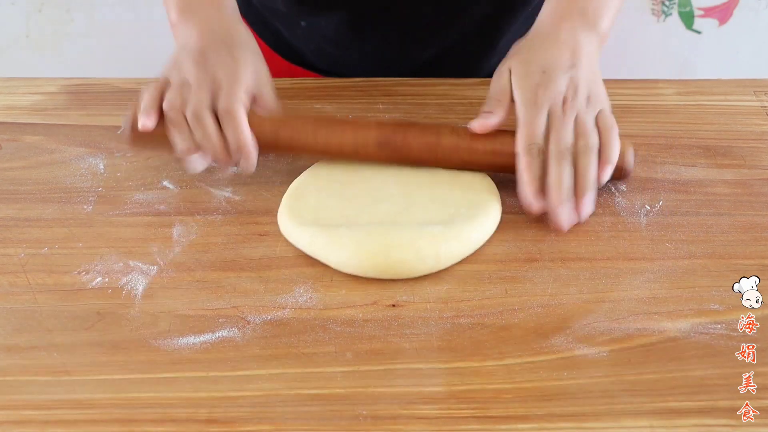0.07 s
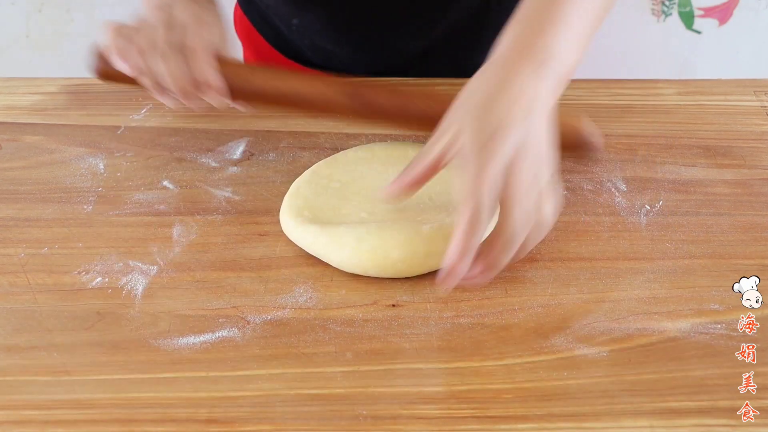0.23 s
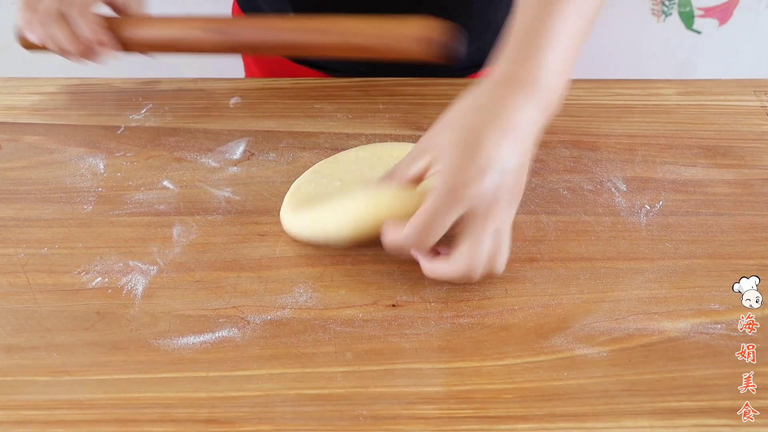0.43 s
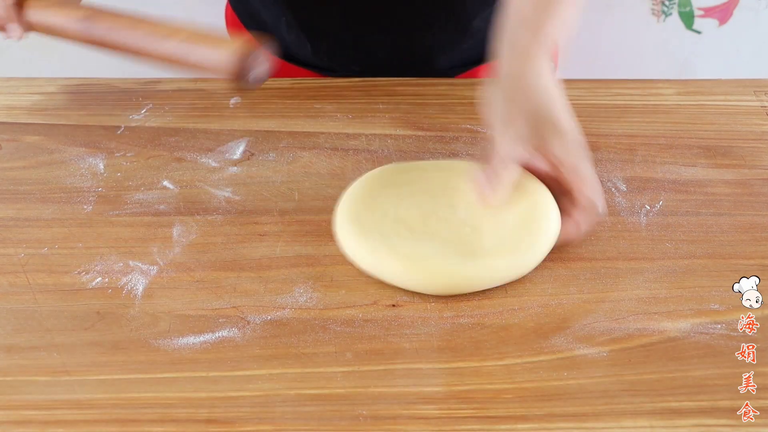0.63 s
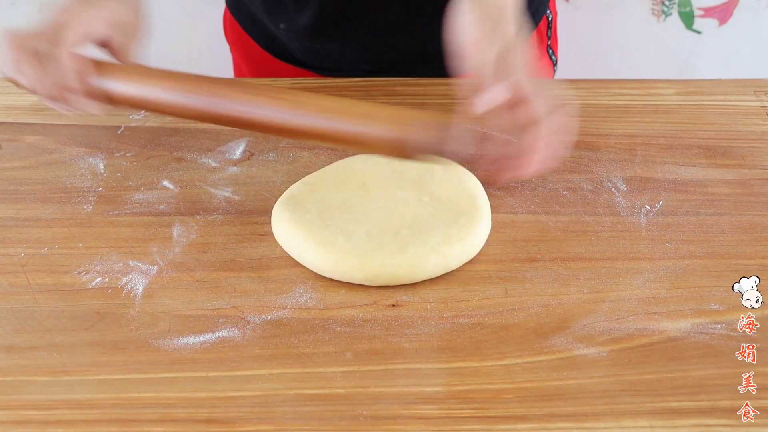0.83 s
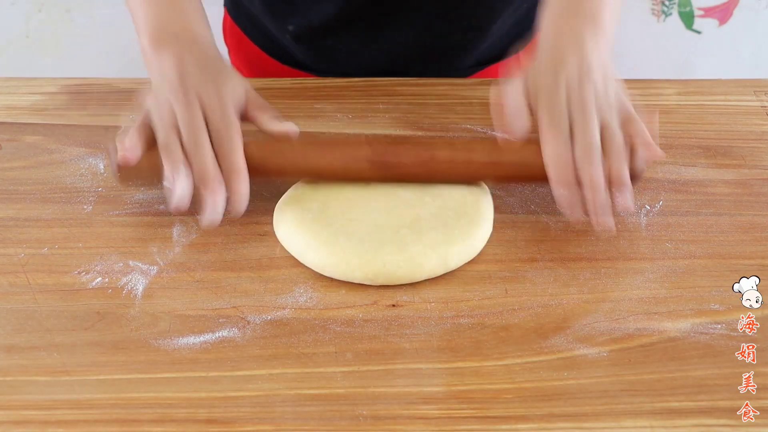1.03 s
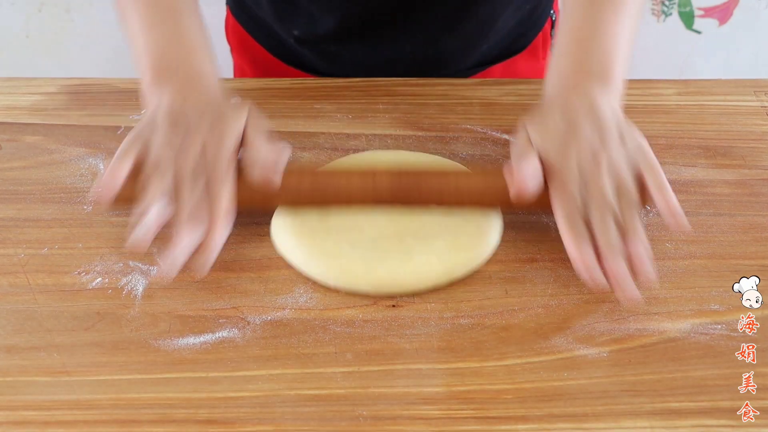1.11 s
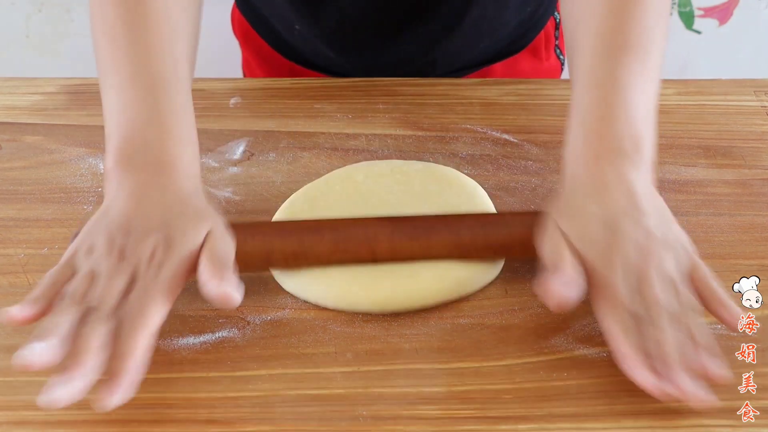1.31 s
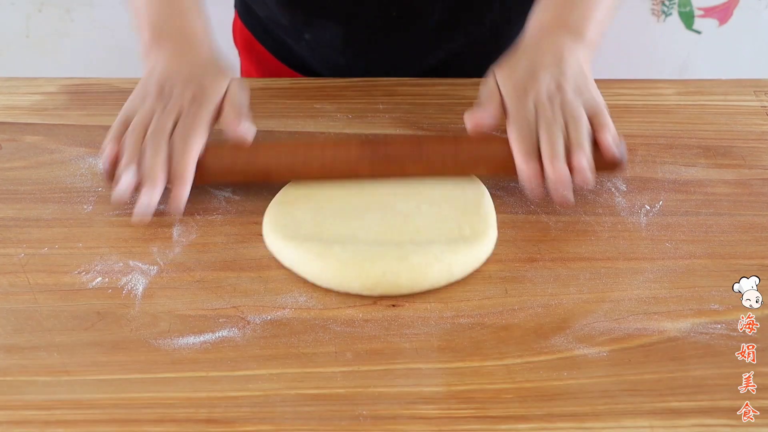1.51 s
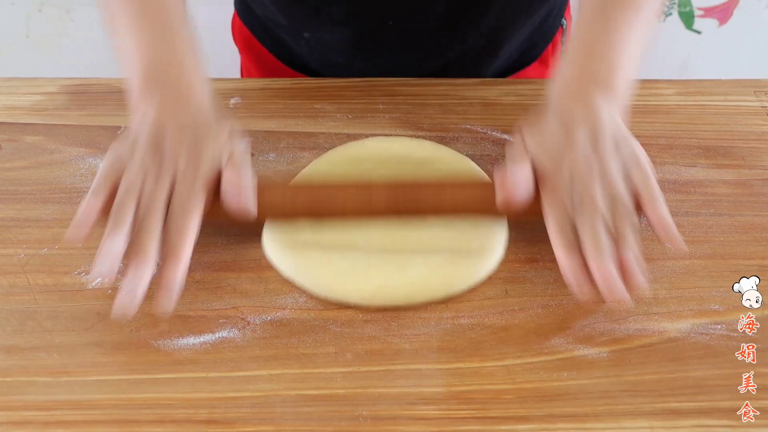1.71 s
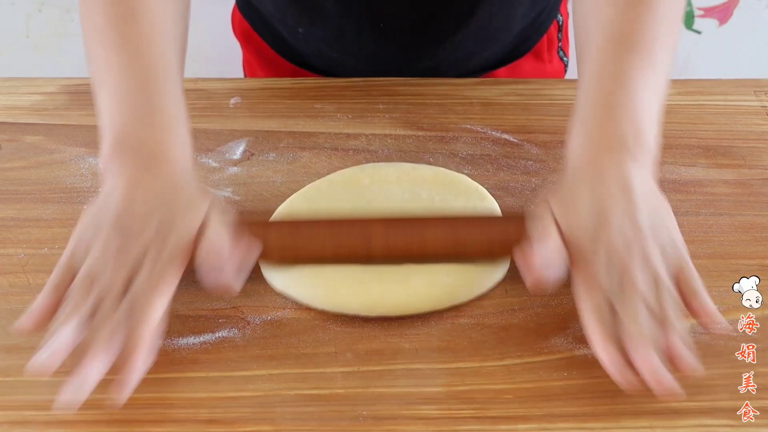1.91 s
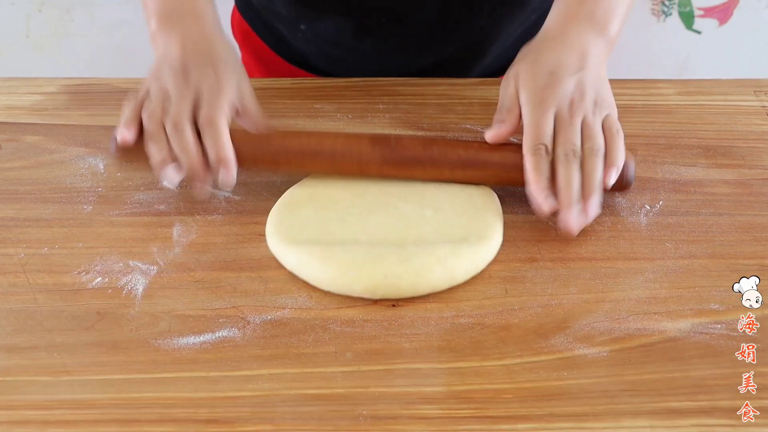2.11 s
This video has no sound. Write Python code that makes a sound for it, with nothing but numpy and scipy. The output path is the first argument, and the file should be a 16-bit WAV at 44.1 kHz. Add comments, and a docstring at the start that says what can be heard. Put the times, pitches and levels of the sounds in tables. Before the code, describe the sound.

Rolling pin working dough on a wooden table: one strong hollow knock, soft rubs, light later taps

```python
"""A low wooden hum and the hiss of floury palms open the scene: a rolling pin works dough in a small kitchen.
The hum is board modes driven by uneven force, with table sway below; palms and dragged dough are shaped noise.
The pin's end then knocks the board and bounces: decaying modes and a burst of rattle, answered by the room.
Sticky ticks are damped sines. All of it sits in the centre over steady kitchen and microphone noise; only
the microphones' self-noise differs from side to side."""
import sys
import numpy as np
from scipy import signal
from scipy.fft import rfft, irfft, next_fast_len
from scipy.io import wavfile
from scipy.ndimage import map_coordinates

SR = 44100
rng = np.random.default_rng(int(sys.argv[2]) if len(sys.argv) > 2 else 0)


def materialize(psi):
    """Save the field psi as 16-bit PCM at rate SR to the path in sys.argv[1].

    A 1-D psi becomes a single channel; in a 2-D psi each row is a channel.
    """
    bounded = np.clip(np.atleast_2d(psi).T, -1, 1)
    quanta = np.round(bounded * 32767).astype(np.int16)
    wavfile.write(sys.argv[1], SR, quanta)


def ratio_of_db(decibels):
    """Turn decibels (scalar or array-like) into linear amplitude factors; 0 dB maps to 1."""
    return 10 ** (np.asarray(decibels, float) / 20)


N = 94815

# Steady kitchen and microphone noise, relative spectrum: f/Hz, level/dB
AIR = [(15, -20), (30, 2), (50, -2), (80, 0.5), (130, -1), (200, -5.5), (320, -6.5), (730, -5), (2500, -16),
       (6100, -21.5), (9000, -23.5), (15800, -28)]
# Microphone self-noise, opposite in the two sides, relative spectrum: f/Hz, level/dB
SELF_NOISE = [(20, 12), (60, 15.5), (300, 7), (800, 3), (1500, -3.5), (4000, 1), (15800, 2.5)]
AIR_DB, SELF_NOISE_DB = -50, -72.5  # rms

# Push on the board: t/s, rolling force level/dB (before PUSH_DB), 125 Hz hum level/dB (before its swells),
# 189 Hz hum level/dB (before its swells), table sway level/dB
PUSH = [(0.0, -44, -45, -59, -70), (0.03, -46, -49.5, -64, -76), (0.11, -55, -58, -67, -59),
        (0.2, -57, -55, -62, -67), (0.25, -48, -52, -55, -52), (0.32, -55, -57, -61, -61),
        (0.36, -46, -53, -53, -47), (0.45, -49, -62, -56, -59), (0.51, -49, -63, -56, -78),
        (0.54, -51.5, -60, -59, -58), (0.74, -60, -65.5, -67, -59), (0.81, -62, -78, -60.5, -82),
        (0.93, -58, -84, -61, -58), (1.05, -62.5, -74, -62.5, -75), (1.11, -49, -75, -66, -44),
        (1.17, -54, -63, -62, -37), (1.29, -55, -58, -71, -45), (1.44, -56, -64, -60, -66),
        (1.51, -55, -69, -56, -62), (1.54, -58, -68, -58, -68), (1.57, -54, -65, -53, -56),
        (1.67, -66.5, -70, -58, -51), (1.84, -51, -68, -60, -58), (1.93, -54.5, -55.5, -67, -58),
        (2.02, -52, -48.5, -69, -56), (2.15, -60, -53, -62, -57)]
PUSH_DB, PUSH_TOP_HZ = -1.5, 350
LOW_HUM_HZ, HIGH_HUM_HZ, HUM_WIDTH_HZ = 125.3, 189.5, 3.38  # width: how far the two pitches stray
SWAY_HZ, SWAY_WAVER_HZ = 32, 0.4

# Sliding strokes: start t/s, full t/s, fading t/s, end t/s, palm hiss level/dB, dough and flour drag level/dB
STROKES = [(-.05, 0.047, 0.082, 0.14, -54, -52.5), (0.147, 0.208, 0.22, .24, -50.5, -62),
           (0.317, .33, 0.42, 0.4653, -59, -47.5), (0.589, 0.707, 0.73, 0.88, -45, -40.5),
           (0.744, 0.842, 0.954, 0.975, -55.5, -45), (1.084, 1.115, 1.17, 1.175, -50.5, -54.5),
           (1.155, 1.273, 1.313, 1.42, -50, -47.5), (1.506, 1.536, 1.555, 1.58, -51, -47),
           (1.54, 1.566, 1.614, 1.676, -56, -54.5), (1.744, 1.778, 1.79, 1.83, -47.5, -48),
           (1.8, 1.843, 1.9, 1.96, -50, -50.5), (2.046, 2.1, 2.15, 2.2, -51.5, -51)]
STROKE_FADE_DB = 13  # how far below full a stroke starts and ends
# Palms on the pin, relative spectrum: f/Hz, level/dB
PALM = [(900, -52), (1500, -25), (2200, -34), (3400, -0.5), (5000, -1.5), (6150, -12.5), (7100, -1.5),
        (9500, -2), (13000, -4.5), (15500, -6.5)]
# Dough dragged on the board, relative spectrum: f/Hz, level/dB
DRAG = [(150, -37), (250, -19), (330, -17), (369, -8), (481, -10), (752, -3), (1240, -7), (2360, -6.5),
        (6090, -22), (7000, -21), (9100, -46), (15400, -120)]
GRIT = 0.4  # spread of the flour grains' log amplitude

# Pin meets board: t/s, level/dB, top of the contact pulse f/Hz (hardness; held to 9000),
# bass cut f/Hz (high for a glancing blow), slow board ring level/dB (added to BOARD_DB), rattle level/dB
KNOCKS = [(0.2256, -15.5, 1480, 60.5, -0.5, -7), (0.319, -41.5, 4430, 1500, -10, 4.5),
          (0.3515, -30, 930, 198, 3, -4), (0.3929, -36, 780, 200, 4.5, 20), (.408, -42.5, 600, 198, 3, -4),
          (1.093, -44, 1270, 149, -1, 2), (1.1529, -40.5, 1010, 70, 1.5, 3),
          (1.487, -31.5, 4400, 1500, -20, 1.5), (1.4915, -24.5, 1700, 1099, -6, -8),
          (1.501, -34.5, 1500, 350, 3, 0), (1.9904, -43, 1080, 220, -1.5, -11),
          (1.991, -38, 260, 90, 6, -6)]
# Quick ring of pin and board top: f/Hz, level/dB (before scatter), t60/s
PIN = [(182, -2.5, 0.046), (561, 3.5, 0.046), (1054, 2, 0.019), (1500, -1, 0.021), (2000, -9, 0.022),
       (2500, -30, .02), (3180, -15, .02), (4800, -27, .015)]
# Slow ring of the board on its table: f/Hz, level/dB (before scatter), t60/s
BOARD = [(74.3, -8, 0.23), (122.8, -2.5, 0.27), (194, -4.5, 0.25), (244.3, -1.5, 0.2), (285.2, -3, 0.27),
         (352, -2, 0.18), (413.3, -6.5, 0.13), (496, -5.5, 0.19), (585, -5.5, 0.14), (630.4, -1, 0.13),
         (706, -8.5, 0.16), (881, -17, 0.18), (1000, -41, 0.072), (1123, -1.5, 0.097), (1230, -5.5, 0.087)]
BOARD_DB = -5.5
SWELL_S = 0.00043  # time constant of the modes' build-up
WAVER, WAVER_PER_S, WAVER_FULL_HZ = 1.08, 46.5, 600  # phase drift: radians, knots a second; less below this pitch
RATTLE_T60 = 0.12  # the many small modes blur into dying noise (s)
# The ring of the first blows drops away, perhaps as a hand presses on the board
DAMP_S, DAMP_DB, DAMP_OVER_S = 0.423, 6, 0.034

# Sticky ticks of dough and skin: t/s, level/dB, f/Hz, cycles in which the tick falls by 30 dB
TICKS = [(0.319, -37, 7540, 14), (.319, -27, 2000, 6), (.352, -33, 2500, 6), (0.3936, -28, 2650, 8.6),
         (1.1095, -45, 3800, 6), (1.1195, -40, 8500, 8), (1.1524, -23.5, 9150, 22),
         (1.1545, -33.5, 3550, 27), (1.4594, -32, 2500, 5.6)]
TICK_RISE_S = 0.00034

# Decay of the small kitchen: f/Hz, t60/s
KITCHEN = [(100, .35), (250, 0.6), (500, 0.54), (1500, 0.46), (5000, 0.1), (12000, 0.21)]
ROOM_DB, TICK_ROOM_DB = -7, -10  # room level against direct sound, knocks and ticks
TOP_HZ = 15830  # upper band limit


def unit(x):
    """Scaled to rms 1."""
    return x / np.sqrt(np.mean(x ** 2) + 1e-20)


def along(points, hz):
    """Reads (f/Hz, value) points on a log frequency axis."""
    f, value = np.transpose(points)
    return np.interp(np.log(hz + 1), np.log(f + 1), value)


def curves(rows):
    """One value per sample for each column after the time."""
    s, *columns = np.transpose(rows)
    return [np.interp(np.arange(N) / SR, s, column) for column in columns]


def wobble(rate):
    """A smooth random curve, rate knots a second."""
    knots = rng.standard_normal(int(N * rate / SR) + 4)
    return map_coordinates(knots, [np.arange(N) * rate / SR])


def wander(count, rate):
    """Straight lines between random knots, rate knots a second, starting at 0."""
    knots = rng.standard_normal(int(count * rate / SR) + 4)
    curve = map_coordinates(knots, [np.arange(count) * rate / SR], order=1)
    return curve - curve[0]


def filtered(x, response):
    """Shapes the spectrum of x by a function of frequency."""
    m = next_fast_len(N + SR)
    return irfft(rfft(x, m) * response(np.fft.rfftfreq(m, 1 / SR)), m)[..., :N]


def colored_noise(spectrum):
    """Steady noise of rms 1 with the given spectrum."""
    return unit(filtered(rng.standard_normal(N), lambda hz: ratio_of_db(along(spectrum, hz))))


def ring(modes, scatter_db=0):
    """Impulse response of modes that build up and decay, neighbours in opposite phase, phases drifting."""
    t = np.arange(SR // 2) / SR
    total = np.zeros(len(t))
    for k, (hz, db, t60) in enumerate(modes):
        level_db = db + scatter_db * rng.standard_normal()
        drift = WAVER * min(hz / WAVER_FULL_HZ, 1) * wander(len(t), WAVER_PER_S)
        total += (-1) ** k * ratio_of_db(level_db - 60 * t / t60) * np.sin(2 * np.pi * hz * t + drift)
    return (1 - np.exp(-t / SWELL_S)) * total


def room():
    """A fresh noise tail of energy 1; each frequency dies at its own speed."""
    hz, t, z = signal.stft(rng.standard_normal(SR), SR, nperseg=256)
    decay = ratio_of_db(-60 * t / along(KITCHEN, hz)[:, None])
    tail = signal.istft(z * decay, SR, nperseg=256)[1]
    return np.pad(tail / np.linalg.norm(tail), (200, 0))  # the room answers 200 samples late


def add(track, s, sound):
    """Mixes a sound in at time s."""
    part = track[round(s * SR):][:len(sound)]
    part += sound[:len(part)]


def air():
    """Steady kitchen and microphone noise, shaped from white noise."""
    return ratio_of_db(AIR_DB) * colored_noise(AIR)


def self_noise():
    """Steady microphone noise, to be added on one side and subtracted on the other."""
    return ratio_of_db(SELF_NOISE_DB) * colored_noise(SELF_NOISE)


def board_hum(mode_hz):
    """One board mode under the push: a sine whose pitch strays and whose level swells at random."""
    hz = mode_hz + HUM_WIDTH_HZ * wobble(17)
    swells = ratio_of_db(5.5 * wobble(11))
    return np.sqrt(2) * swells * np.sin(2 * np.pi * np.cumsum(hz) / SR)


def table():
    """Uneven rolling force hums in the board, most clearly in two low modes near 125 and 189 Hz; the table sways."""
    push_db, low_hum_db, high_hum_db, sway_db = curves(PUSH)
    force = filtered(rng.standard_normal(N), lambda hz: 1 / (1 + (hz / PUSH_TOP_HZ) ** 2))
    body = ratio_of_db(push_db + PUSH_DB) * unit(signal.fftconvolve(force, ring(BOARD))[:N])
    low_hum = ratio_of_db(low_hum_db) * board_hum(LOW_HUM_HZ)
    high_hum = ratio_of_db(high_hum_db) * board_hum(HIGH_HUM_HZ)
    sway_phase = 2 * np.pi * np.cumsum(SWAY_HZ + SWAY_WAVER_HZ * wobble(8.9)) / SR
    sway = np.sqrt(2) * ratio_of_db(sway_db) * np.sin(sway_phase)
    return body + low_hum + high_hum + sway


def rub(spectrum, flutter_db):
    """Friction noise of rms 1, roughened by flour grains and a random flutter."""
    grains = np.exp(GRIT * rng.standard_normal(N)) * ratio_of_db(flutter_db * wobble(59.71))
    return unit(filtered(rng.standard_normal(N) * grains, lambda hz: ratio_of_db(along(spectrum, hz))))


def hands():
    """Palms slide on the pin and dough drags on the board, stroke by stroke; powers add."""
    t = np.arange(N) / SR
    palm_power, drag_power = np.zeros(N), np.zeros(N)
    for start, full, fading, end, palm_db, drag_db in STROKES:
        before = np.maximum((full - t) / (full - start), 0)
        after = np.maximum((t - fading) / (end - fading), 0)
        shape = ratio_of_db(-STROKE_FADE_DB * np.minimum(before ** 2 + after ** 2, 20))
        palm_power += (shape * ratio_of_db(palm_db)) ** 2
        drag_power += (shape * ratio_of_db(drag_db)) ** 2
    palms = np.sqrt(palm_power) * rub(PALM, flutter_db=0.6)
    dough = np.sqrt(drag_power) * rub(DRAG, flutter_db=0.6)
    return palms + dough


def knocks():
    """Each blow, dulled by its contact time, rings pin and board; the kitchen answers."""
    out = np.zeros(N)
    for s, db, top_hz, low_hz, board_db, rattle_db in KNOCKS:
        body = ring(PIN, scatter_db=4.5) + ratio_of_db(BOARD_DB + board_db) * ring(BOARD, scatter_db=2.0)
        rattle_decay = ratio_of_db(rattle_db - 60 * np.arange(len(body)) / SR / RATTLE_T60)
        body = body + rattle_decay * rng.standard_normal(len(body))
        bass_cut = signal.butter(2, low_hz, "high", fs=SR, output="sos")
        contact = signal.butter(3, min(top_hz, 9000), fs=SR, output="sos")
        blow = ratio_of_db(db) * signal.sosfilt(contact, signal.sosfilt(bass_cut, body))
        add(out, s, blow)
        add(out, s, ratio_of_db(ROOM_DB) * signal.fftconvolve(blow, room()))
    t = np.arange(N) / SR
    damping = np.clip((t - DAMP_S) / DAMP_OVER_S, 0, 1) * (t < 1)  # first blows only
    return out * ratio_of_db(-DAMP_DB * damping)


def ticks():
    """Short damped sines, roughened by noise, where something unsticks; the kitchen answers."""
    out, t = np.zeros(N), np.arange(600) / SR
    for s, db, hz, cycles in TICKS:
        decay = ratio_of_db(db - 60 * t * hz / (2 * cycles))
        rise = 1 - np.exp(-t / TICK_RISE_S)
        rough = 1 + 0.3 * rng.standard_normal(len(t))
        add(out, s, decay * rise * np.sin(2 * np.pi * hz * t) * rough)
    return out + ratio_of_db(TICK_ROOM_DB) * signal.fftconvolve(out, room())[:N]


def scene():
    """All sources arrive in the centre; only the microphones' self-noise differs between the sides."""
    mid = air() + table() + hands() + knocks() + ticks()
    side = self_noise()
    return np.array([mid + side, mid - side])


def roll_off(x):
    """The treble ends steeply here."""
    return signal.sosfilt(signal.butter(12, 16980, fs=SR, output="sos"), x)


def record(dry):
    """Limits the band of the microphone mix to TOP_HZ."""
    mix = filtered(dry, lambda hz: hz < TOP_HZ)
    return roll_off(mix)


dry = scene()
out = record(dry)
materialize(out)
```